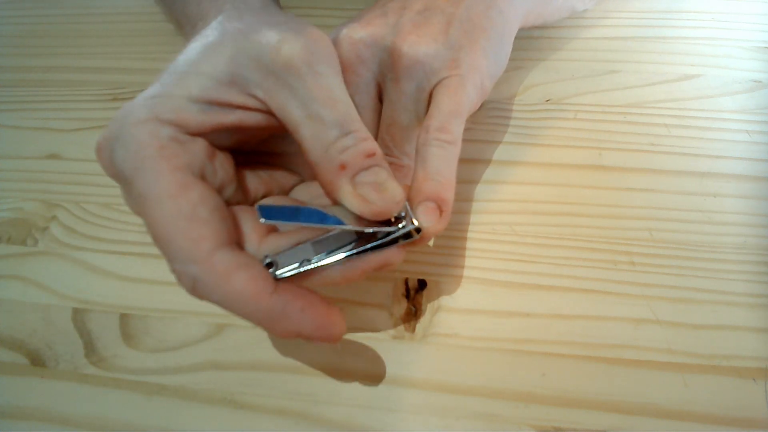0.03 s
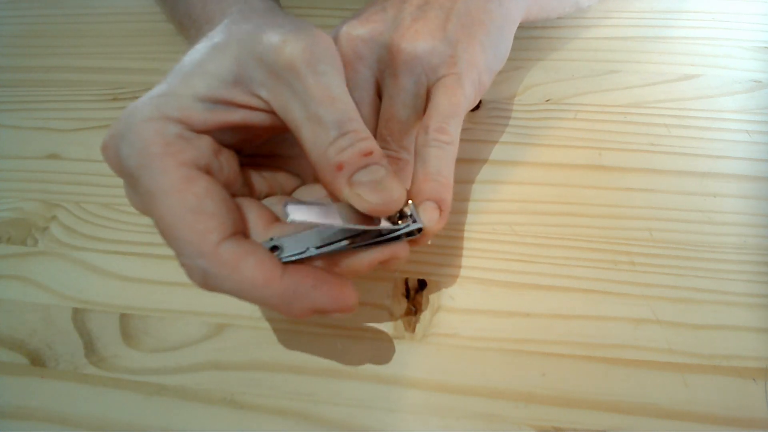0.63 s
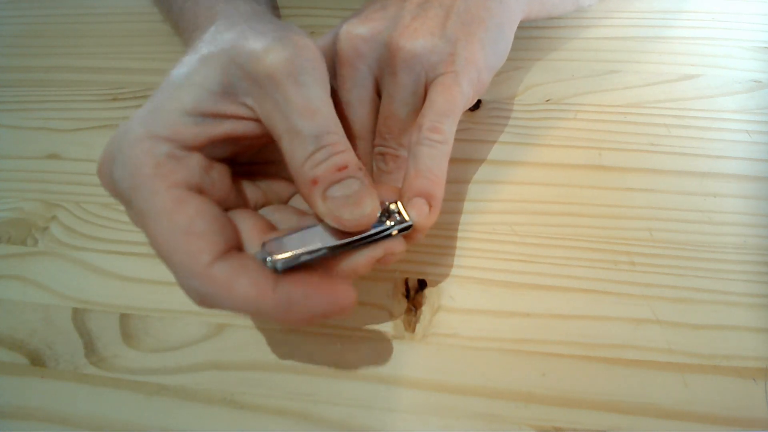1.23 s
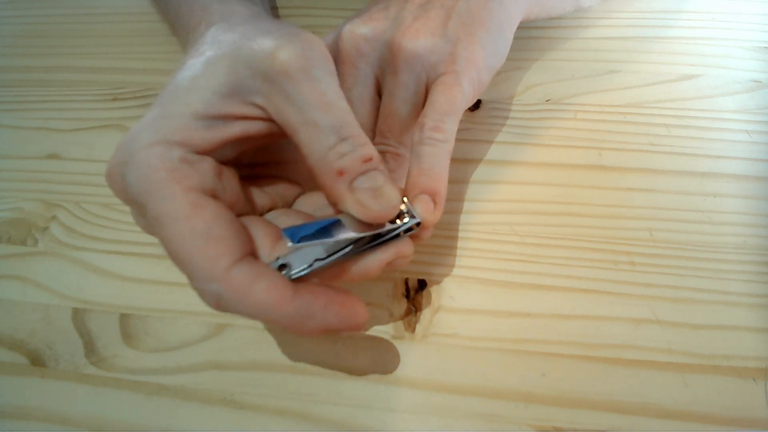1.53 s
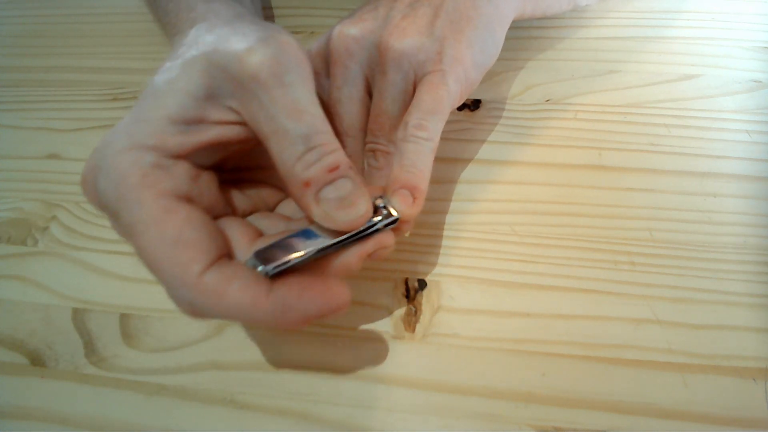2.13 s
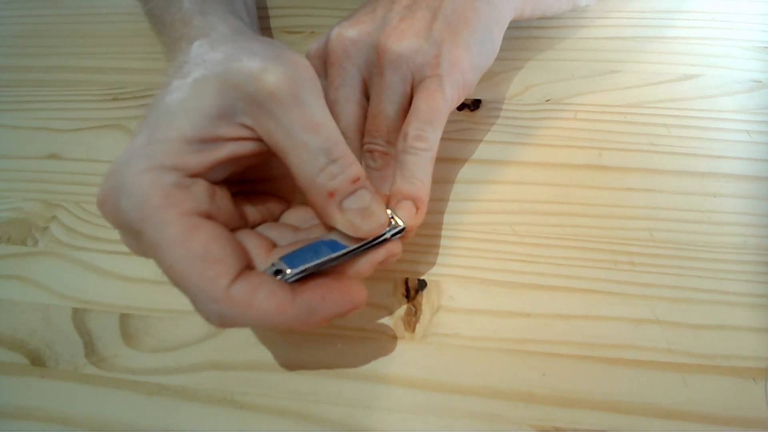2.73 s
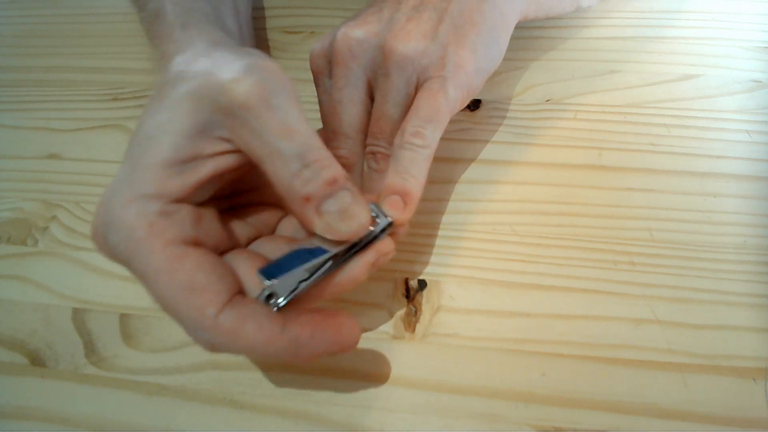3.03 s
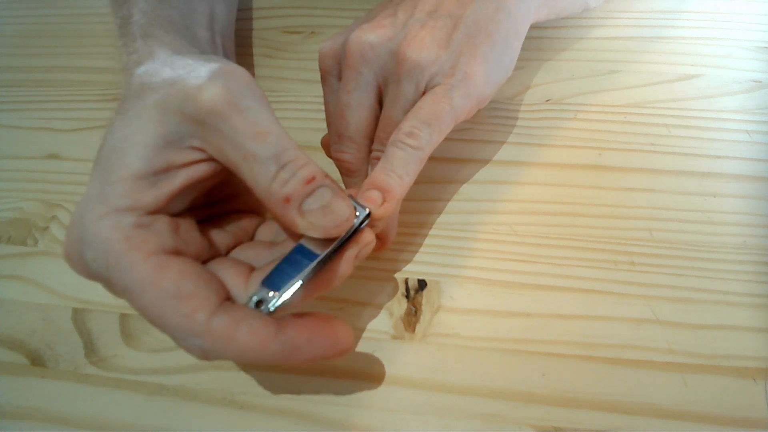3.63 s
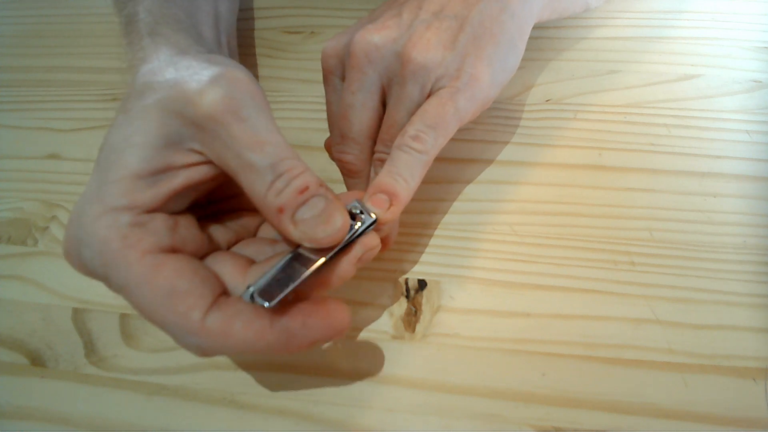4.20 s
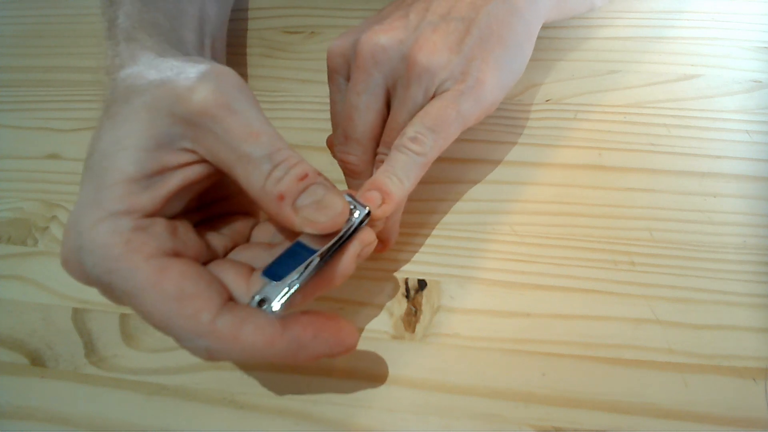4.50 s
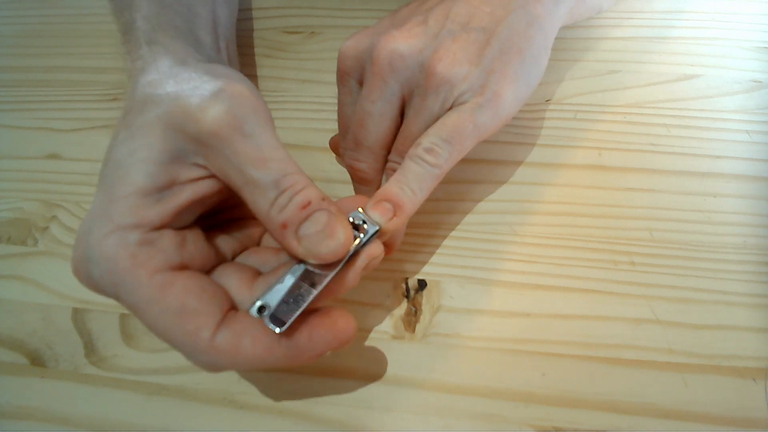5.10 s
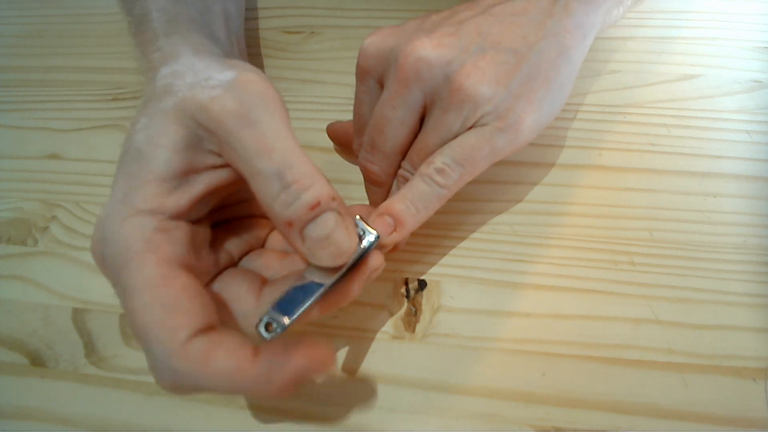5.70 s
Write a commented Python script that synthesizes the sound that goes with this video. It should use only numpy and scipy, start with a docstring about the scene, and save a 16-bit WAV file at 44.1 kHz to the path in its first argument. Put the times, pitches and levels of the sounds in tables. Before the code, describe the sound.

A steel nail clipper cuts a fingernail four times, each cut a sharp, bright snap with a slight metallic ring. The first two are nearly two seconds apart, the others follow about a second apart. Between them come a light double click of the lever and faint finger taps and rubs, and a tiny skin creak follows the last. It is heard close up over a wooden table in a small, quiet room.

```python
"""A steel nail clipper bites through a fingernail four times, just above a wooden table in a small room.
Each bite is a millisecond crack that rings the jaws; the table and walls throw it back.
Around the bites the lever gives one double click, and fingers tap, rub and creak on the clipper.
Underneath lies a quiet bed of rumble, hiss and electrical hum."""
import sys
import numpy as np
from scipy import signal
from scipy.fft import rfft, irfft
from scipy.io import wavfile
from scipy.ndimage import uniform_filter1d, map_coordinates

SR = 44100
rng = np.random.default_rng(int(sys.argv[2]) if len(sys.argv) > 2 else 0)


def store_pcm(level_fs):
    """Save levels as 16-bit WAV."""
    pcm = np.round(np.clip(level_fs, -1, 1) * 32767).astype(np.int16)
    wavfile.write(sys.argv[1], SR, np.atleast_2d(pcm).T)


N = 253575

# The nail gives way, each piece at its own pitch; halfway through, the hand changes grip:
# start_s, level_db, fullness_db, snap_hz, snap_db, grip (row of JAW_RESONANCES)
BITES = [(1.0917, -22.5, -5.5, 7200, 3.5, 0), (2.8483, -19, 0, 7500, 1, 0),
         (4.0584, -21.5, 5, 4900, 3.5, 1), (5.0185, -22, 3, 4640, 8, 1)]
# The jaws' two resonances, one row per grip: low_hz, low_db, high_hz, high_db
JAW_RESONANCES = [(5700, 8.5, 13250, 15), (5420, 8.5, 11450, 8)]
# Tone of the breaking nail: frequency_hz, gain_db
CRACK_EQ = [(500, -44.5), (1500, -20), (2300, -11.5), (2950, -15), (3600, -6), (4200, -6.5), (4950, -1.5),
            (6400, 1), (7900, 2), (9000, -7), (10200, -4.5), (12000, -2.5), (14200, 1), (15300, -0.5)]
# The lever slips in its seat: start_s, level_db
LEVER_CLICKS = [(1.965, -49), (1.9675, -46)]
# Tone of the lever: frequency_hz, gain_db
LEVER_EQ = [(300, -26), (1400, -23), (2500, -5), (3700, -0.5), (4900, -4), (5950, 5), (8000, -2.5),
            (10000, -15), (11200, -9), (12600, 2), (14200, -5), (16000, -11)]
# Fingertips and nail knock on the clipper: start_s, level_db, tilt_db_per_octave, thud_hz
FINGER_TAPS = [(1.874, -62, -2.5, 1010), (1.9372, -58.5, -1.5, 855), (2.119, -64, 1, 1460),
               (2.502, -63.5, 1, 1380), (2.7694, -54.5, 5, 566), (3.139, -69, 11, 1000),
               (4.429, -65, 6, 1000)]
# Tone of a soft knock: frequency_hz, gain_db
KNOCK_EQ = [(150, -27), (420, 1.5), (650, -2.5), (1000, 3.5), (2400, -3.5), (5000, -9), (10000, -16.5),
            (16000, -48.5)]
# Skin slides on steel and nail: middle_s, half_length_s, level_db
SKIN_STROKES = [(2.133, 0.0093, -76), (2.775, .01, -79), (3.164, .027, -68), (4.484, .017, -73.5),
                (5.31, 0.034, -81), (5.368, 0.026, -74)]
# Tone of rubbing skin: frequency_hz, gain_db
SKIN_EQ = [(150, -28.5), (450, -1), (1400, 6), (4200, 8.5), (7500, 5.5), (10500, -2), (16000, -35)]
# Early reflections off near surfaces: delay_s, level_db
REFLECTIONS = [(.0053, -3.5), (.0074, -8.5), (0.0123, -13), (.0205, -10.5)]
# Decay and tone of the reverb: frequency_hz, t60_s, gain_db
REVERB_BANDS = [(304, 0.35, -1.5), (2200, 0.3, -9), (3600, 0.24, -3), (5700, 0.24, -0.5), (9840, 0.25, 1),
                (13200, 0.19, 5.5), (15500, .19, 4.5)]
# Tone of the rumble and hiss: frequency_hz, gain_db
AIR_EQ = [(15, 1.5), (32, 0.5), (50, -4.5), (90, -7.5), (160, -13), (270, -17), (470, -20.5), (900, -24),
          (1900, -26), (4600, -24), (7000, -27.5), (9500, -32), (15500, -34)]
# Steady electrical hum: pitch_hz, rms_level_db
HUM_TONES = [(60, -71.5), (120, -91), (302.8, -80)]


def bites(body_hz=3800, treble_hz=9800, low_ring_db=-39, high_ring_db=-41, arm_hz=3620, arm_db=-42):
    """Each crack drives the jaws' broad resonances; two ring on faintly, as does the sprung arm."""
    out = np.zeros(N)
    for start_s, db, fullness_db, snap_hz, snap_db, grip in BITES:
        low_hz, low_db, high_hz, high_db = JAW_RESONANCES[round(grip)]

        def bite_eq(hz):
            weight = 1 / (1 + (hz / body_hz) ** 6)
            sparkle = 1 - 1 / (1 + (hz / treble_hz) ** 12)
            snap = snap_db * bell(hz, snap_hz, width_hz=620)
            nail = curve(CRACK_EQ, hz) + fullness_db * (weight + sparkle) + snap
            jaws = low_db * bell(hz, low_hz, width_hz=340) + high_db * bell(hz, high_hz, width_hz=580)
            blades = 6 * bell(hz, 15500, width_hz=350)
            return nail + jaws + blades

        fracture = burst(length_s=0.0012, chatter_db=-10, chatter_t60_s=0.02)
        add(out, start_s, amp(db) * signal.fftconvolve(fracture, impulse(bite_eq)))
        for hz, ring_db in (low_hz, low_db + low_ring_db), (high_hz, high_db + high_ring_db):
            add(out, start_s, amp(db + ring_db) * steel_ring(hz, spread_hz=280, t60_s=0.21, count=11))
        add(out, start_s, amp(db + arm_db) * steel_ring(arm_hz, spread_hz=180, t60_s=0.13, count=5))
    return out


def burst(length_s, chatter_db, chatter_t60_s, size=2048, smooth_bins=15):
    """The raw transient: a spray of tiny fractures trailed by weak chatter, even in spectrum."""
    t = np.arange(size) / SR
    envelope = np.exp(-(t / length_s) ** 4) + amp(chatter_db - 60 * t / chatter_t60_s)
    spectrum = rfft(envelope * rng.standard_normal(size))
    power = np.abs(uniform_filter1d(np.abs(spectrum) ** 2, smooth_bins))
    spray = irfft(spectrum / np.sqrt(power + 1e-12))[:size // 2]
    return spray / np.linalg.norm(spray) * np.sqrt(SR / 1000)  # the energy of 1 ms at rms 1


def steel_ring(hz, spread_hz, t60_s, count):
    """A cluster of close steel modes dies away, each struck in its own phase."""
    t = np.arange(SR // 3) / SR
    modes_hz = hz + spread_hz * (np.linspace(-1, 1, count) + rng.uniform(-1, 1, count) / count)
    waves = np.sin(2 * np.pi * (modes_hz[:, None] * t + rng.random((count, 1))))
    return unit_rms(waves.sum(axis=0)) * amp(-60 * t / t60_s)


def lever(ring_hz=6385, ring_db=-18, ring_t60_s=0.069):
    """A light double click of steel on steel."""
    out, t = np.zeros(N), np.arange(SR // 4) / SR
    steel = impulse(lambda hz: curve(LEVER_EQ, hz))
    for start_s, db in LEVER_CLICKS:
        contact = burst(length_s=0.0018, chatter_db=-9, chatter_t60_s=0.013)
        add(out, start_s, amp(db) * signal.fftconvolve(contact, steel))
    start_s, db = LEVER_CLICKS[-1]  # the second, harder contact leaves the lever ringing
    add(out, start_s, amp(db + ring_db - 60 * t / ring_t60_s) * np.sin(2 * np.pi * ring_hz * t))
    return out


def taps(base_thud_db=3, heavier_db_per_octave=17):
    """Fingers set the clipper on the nail; the further a thud sits below 1 kHz, the heavier it lands."""
    out = np.zeros(N)
    for start_s, db, tilt, thud_hz in FINGER_TAPS:
        thud_db = base_thud_db - heavier_db_per_octave * min(octaves(thud_hz), 0)
        add(out, start_s, amp(db) * knock(tilt, thud_hz, thud_db))
    return out


def knock(tilt_db_per_octave, thud_hz, thud_db):
    """A damped knock with a short thud: dull from flesh, brighter from the nail."""
    thud = lambda hz: thud_db * bell(hz, thud_hz, width_hz=90)
    finger = impulse(lambda hz: curve(KNOCK_EQ, hz) + tilt_db_per_octave * octaves(hz) + thud(hz))
    return signal.fftconvolve(burst(length_s=0.0031, chatter_db=-22, chatter_t60_s=0.032), finger)


def creak(start_s=5.2805, level_db=-56.5, swell_db=5.5, first_gap_s=0.0197, slowing=1.22, slips=3):
    """The grip relaxes: skin slips on the lever, ever more slowly, hardest in the middle."""
    out = np.zeros(N)
    for k, place in enumerate(np.linspace(-1, 1, slips)):
        slip = knock(tilt_db_per_octave=-2, thud_hz=460, thud_db=8)
        add(out, start_s, amp(level_db - swell_db * place ** 2) * slip)
        start_s += first_gap_s * slowing ** k
    return out


def rubs(grain_db=4, slips_per_s=400, full_bright_db=-71, dulling_per_db=0.5):
    """Short strokes of skin swell and fade, grainy from stick and slip; the lighter, the duller."""
    out, t = np.zeros(N), np.arange(N) / SR
    slips = map_coordinates(rng.standard_normal(N // 8), [t * slips_per_s], order=1)
    friction = unit_rms(amp(grain_db * slips) * rng.standard_normal(N))
    for middle_s, half_length_s, db in SKIN_STROKES:
        swell = amp(db) * np.exp(-((t - middle_s) / half_length_s) ** 2 / 2)
        tilt_db_per_octave = dulling_per_db * min(db - full_bright_db, 0)
        skin = impulse(lambda hz: curve(SKIN_EQ, hz) + tilt_db_per_octave * octaves(hz))
        out += signal.fftconvolve(swell * friction, skin)[:N]
    return out


def reverb(sound, scatter_db=-8, block=SR // 2):
    """Smeared early reflections and a diffuse tail, new each half second as if the hands had moved."""
    out, t = np.zeros(N), np.arange(block) / SR
    decay = [(hz, t60_s) for hz, t60_s, _ in REVERB_BANDS]
    room_eq = [(hz, db) for hz, _, db in REVERB_BANDS]
    build_up = 1 - np.exp(-(t / REFLECTIONS[0][0]) ** 2)  # the tail blooms with the first reflection
    for start in range(0, N, block):
        bands_hz, frames_s, spectrum = signal.stft(rng.standard_normal(block), SR, nperseg=256)
        fade = amp(-60 * frames_s / curve(decay, bands_hz)[:, None])
        tail = signal.istft(spectrum * fade, SR, nperseg=256)[1][:block] * build_up
        response = tail / np.linalg.norm(tail)
        for delay_s, db in REFLECTIONS:
            smear = rng.standard_normal(32)
            smear *= amp(scatter_db) / np.linalg.norm(smear)
            smear[0] += 1  # the clean bounce leads its scatter
            add(response, delay_s, amp(db) * smear / np.linalg.norm(smear))
        add(out, start / SR, signal.fftconvolve(sound[start:start + block], response))
    return signal.fftconvolve(out, impulse(lambda hz: curve(room_eq, hz)))[:N]


def room_tone(air_db=-68):
    """A bed of soft rumble and hiss with a steady electrical hum."""
    t = np.arange(N) / SR
    hum = sum(amp(db) * np.sqrt(2) * np.sin(2 * np.pi * (hz * t + rng.random())) for hz, db in HUM_TONES)
    air_gain = amp(curve(AIR_EQ, np.fft.rfftfreq(2 * N, 1 / SR)))
    air = irfft(rfft(rng.standard_normal(2 * N)) * air_gain)[:N]
    return hum + amp(air_db) * unit_rms(air)


def impulse(eq, size=4096):
    """Minimum-phase impulse response of energy 1, shaped by eq(hz) in dB."""
    gain = amp(eq(np.fft.rfftfreq(size, 1 / SR)))
    cepstrum = irfft(np.log(gain + 1e-6))
    cepstrum[1:size // 2] *= 2
    cepstrum[size // 2 + 1:] = 0
    response = irfft(np.exp(rfft(cepstrum)))
    return response / np.linalg.norm(response)


def bell(hz, centre_hz, width_hz):
    """A resonance's bell: 1 at its centre, half at width_hz to either side."""
    return 1 / (1 + ((hz - centre_hz) / width_hz) ** 2)


def curve(points, hz):
    """Read (frequency_hz, value) breakpoints on a log frequency axis."""
    points_hz, values = np.transpose(points)
    return np.interp(np.log(hz + 1), np.log(points_hz), values)


def octaves(hz):
    """Octaves above 1 kHz."""
    return np.log2((hz + 1) / 1000)


def amp(db):
    """Decibels to gain."""
    return 10 ** (np.asarray(db) / 20)


def unit_rms(sound):
    """Scale to rms 1."""
    return sound / np.sqrt(np.mean(sound ** 2) + 1e-20)


def add(track, start_s, sound):
    """Mix a sound into the track at start_s."""
    part = track[max(round(start_s * SR), 0):][:len(sound)]
    part += sound[:len(part)]


def scene():
    """Mono mix: clipper and hands up close, their reverb, and room tone."""
    close = bites() + lever() + taps() + creak() + rubs()
    return (close + reverb(close) + room_tone())[None]


def record(dry, cutoff_hz=15880):
    """A steep low-pass shaves off the very top of the mix."""
    hz = np.fft.rfftfreq(2 * N, 1 / SR)
    lowpass = 1 / np.sqrt(1 + (hz / cutoff_hz) ** 400)
    return irfft(rfft(dry, 2 * N) * lowpass)[:, :N]


dry = scene()
out = record(dry)
store_pcm(out)
```